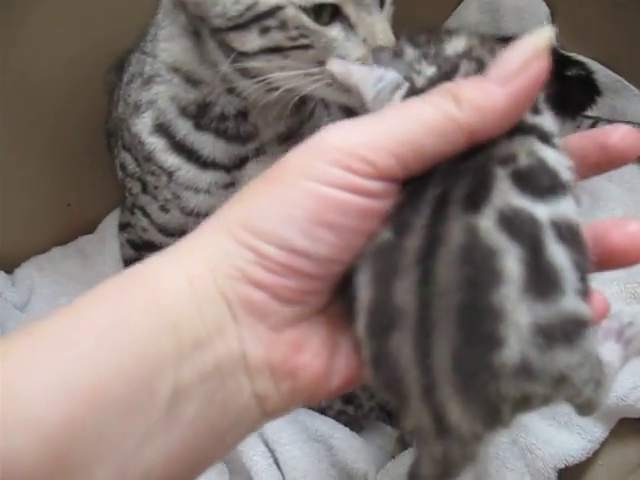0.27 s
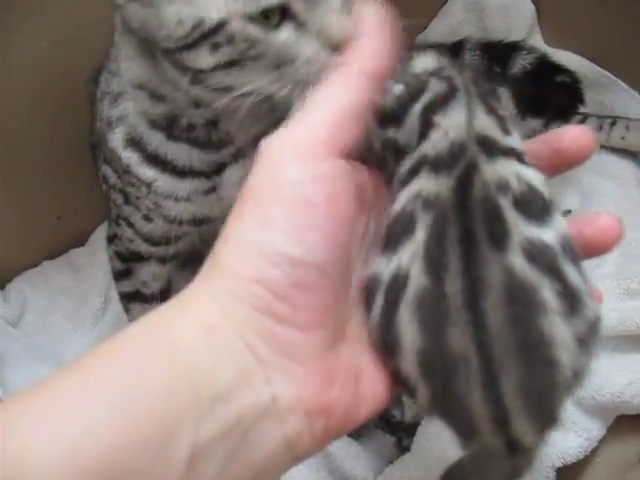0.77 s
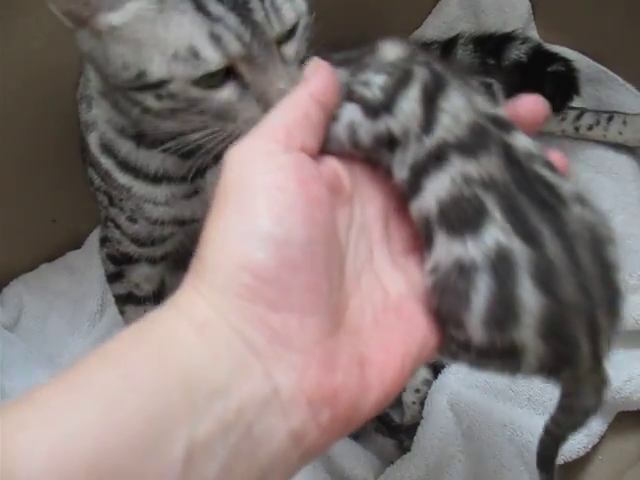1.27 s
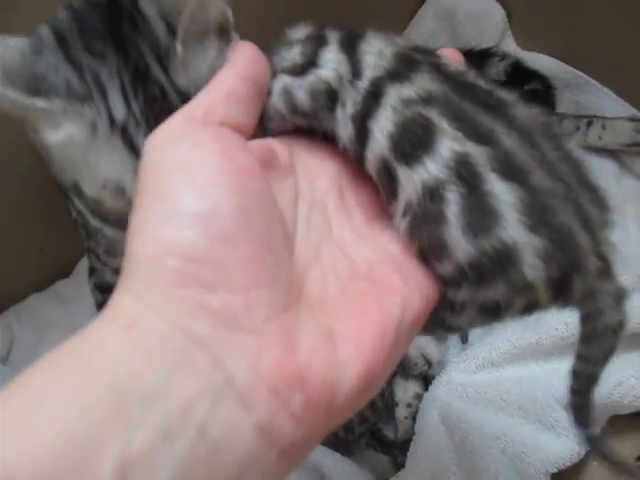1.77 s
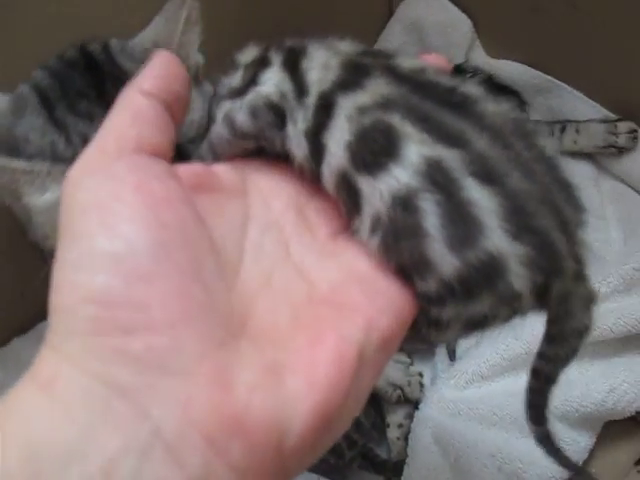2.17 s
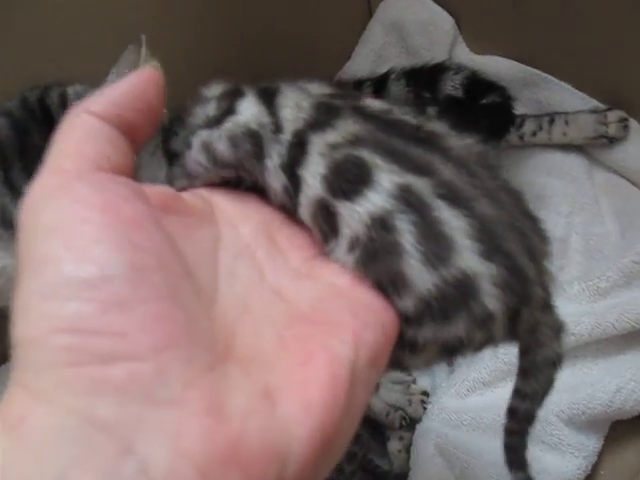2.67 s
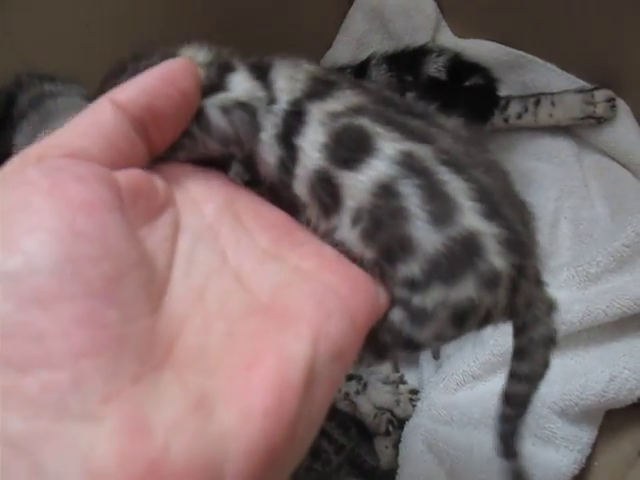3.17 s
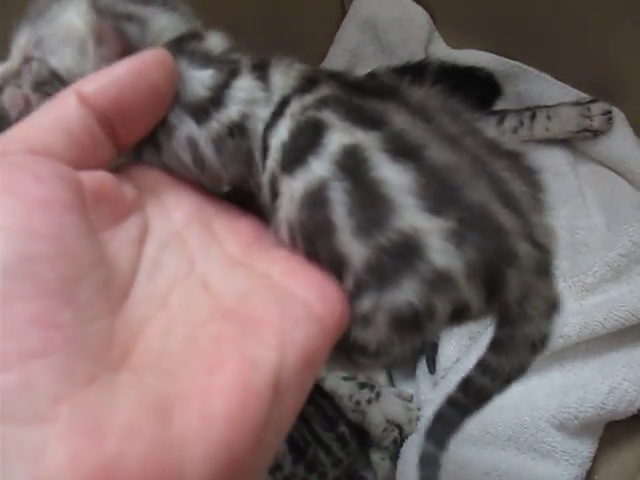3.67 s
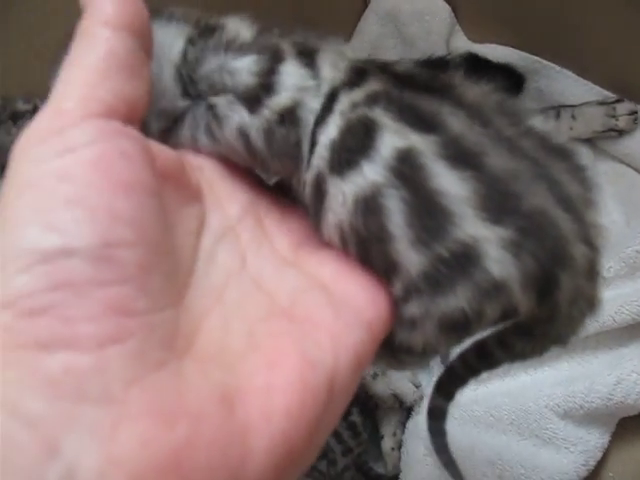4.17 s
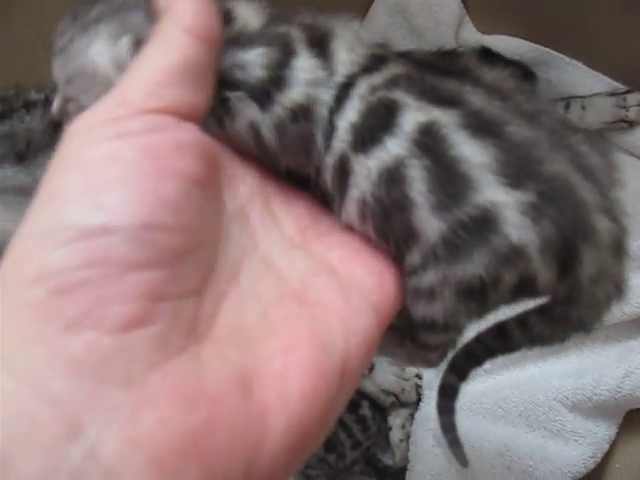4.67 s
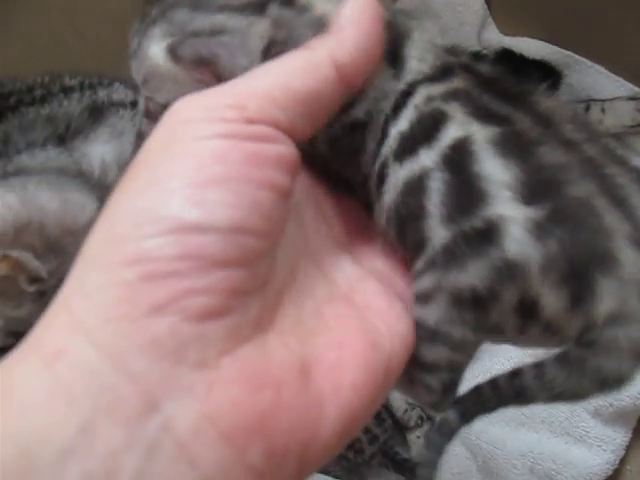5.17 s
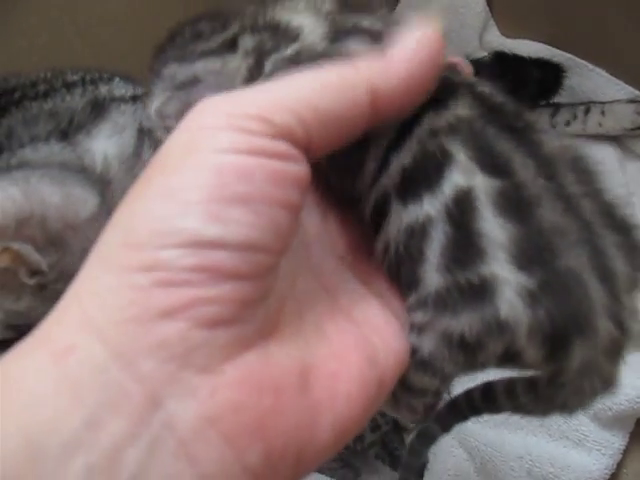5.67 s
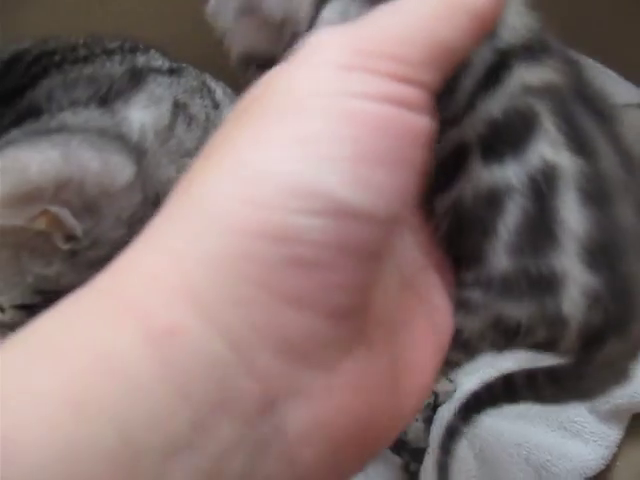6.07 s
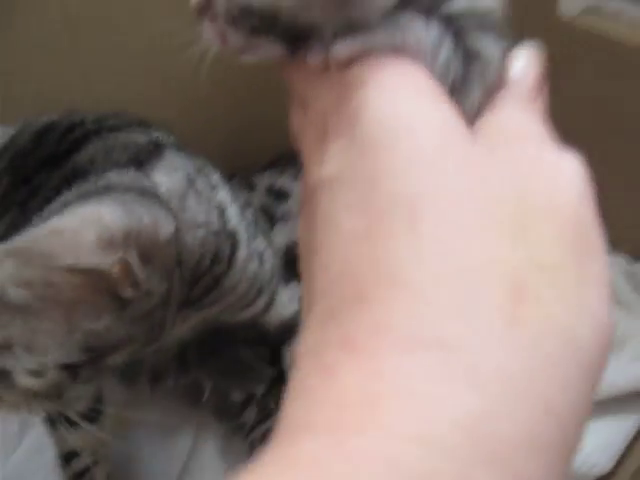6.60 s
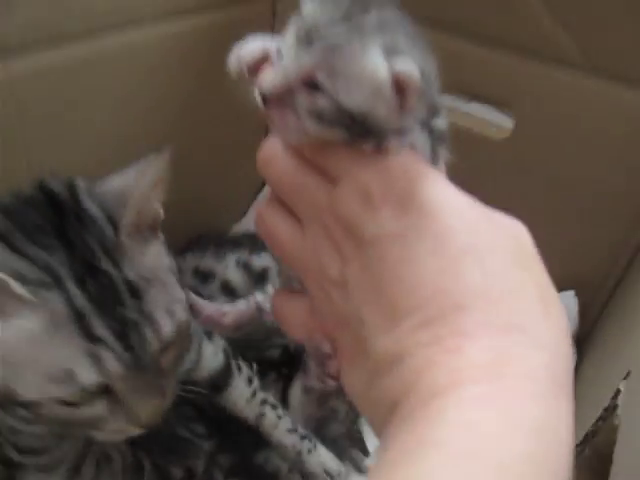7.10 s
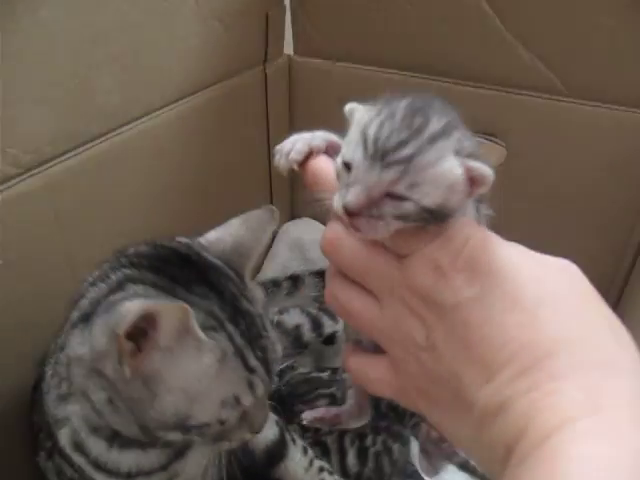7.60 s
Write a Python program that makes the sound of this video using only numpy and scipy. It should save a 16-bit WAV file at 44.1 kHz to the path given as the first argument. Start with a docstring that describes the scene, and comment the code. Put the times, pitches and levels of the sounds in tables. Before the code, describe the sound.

Close, quiet indoor sound of a mother cat's soft thudding purr with short gaps between breaths. Above it come brief, arching kitten mews with cracks in pitch: two early, then two late, the last being strongest. Small wet clicks and fabric rubbing come and go, the rubbing strongest just before seven seconds. The mono microphone has steady hiss, a thin whistle and faint rapid ticking.

```python
"""A mother cat purrs breath by breath in soft hiss, and soon her newborn kitten mews above her.
The mews, from a kitten lifted in a hand over a towel in a cardboard box, are short arches with pitch breaks.
They are built from partials, breath puffs and resonances; each purr beat is a thud that rings the box.
Fur and towel rustle as swelling noise; small mouth and claw clicks are noise bursts that ring.
A small mono camera adds hiss, a thin steady whistle and a faint tick thirty times a second."""
import sys
import numpy as np
from scipy import signal
from scipy.io import wavfile
from scipy.ndimage import uniform_filter1d

SR = 44100
rng = np.random.default_rng(int(sys.argv[2]) if len(sys.argv) > 2 else 0)


def store_pcm(level_fs):
    """Save levels as 16-bit WAV."""
    pcm = np.round(np.clip(level_fs, -1, 1) * 32767).astype(np.int16)
    wavfile.write(sys.argv[1], SR, np.atleast_2d(pcm).T)


N = 345744


def gain_of(db):
    """Turns decibels into a plain multiplier."""
    return 10 ** (np.asarray(db) / 20)


def evened(x):
    """Scales a signal to rms 1."""
    return x / np.sqrt(np.mean(x ** 2) + 1e-20)


def read(points, hz):
    """Reads between the points of a table, on a log-frequency axis."""
    point_hz, value = np.transpose(points)
    return np.interp(np.log(hz + 1), np.log(point_hz + 1), value)


def add(mix, s, sound):
    """Mixes a sound in at time s, in seconds."""
    part = mix[round(s * SR):][:len(sound)]
    part += sound[:len(part)]


def resonate(x, hz, width):
    """Shifts hz (which may glide) down to zero, smooths, and shifts back: a resonance of gain 1."""
    turn = np.exp(2j * np.pi * np.cumsum(hz * np.ones(len(x))) / SR)
    memory = np.exp(-np.pi * width / SR)
    smooth = signal.lfilter([1 - memory], [1, -memory], x / turn + 1e-18)
    return 2 * (turn * smooth).real


def wander(shape, size):
    """Random curves, smoothed twice over size samples, of rms 1."""
    once = uniform_filter1d(rng.standard_normal(shape), size)
    return evened(uniform_filter1d(once, size))


def noise(spectrum, patchy_db, flicker_db):
    """Noise of rms 1 from random short spectra, with drifting patches and a flicker shared by all bands."""
    frames, hz = N // 256 + 5, np.fft.rfftfreq(1024, 1 / SR)
    a, b, patches = rng.standard_normal((frames, 513, 3)).T
    patches = uniform_filter1d(patches, size=14, axis=0)  # along frequency
    patches = evened(uniform_filter1d(patches, size=12, axis=1))  # along time
    flicker = rng.standard_normal(frames)
    level_db = read(spectrum, hz)[:, None] + patchy_db * patches + flicker_db * flicker
    z = (a + 1j * b) * gain_of(level_db)
    return evened(signal.istft(z, nperseg=1024, noverlap=768)[1][:N])


def air():
    """Room air and microphone hiss are shaped noise, and narrow bands of noise hum as low room modes."""
    # Colour of the hiss. Each row: frequency in Hz, relative level in dB per Hz.
    air_colour = [(20, 23), (60, 10.5), (95, 14), (130, 15), (175, 13), (230, 9), (400, 10), (1100, 4.5),
                  (2000, 1.5), (5000, -1.5), (9000, -2.5), (15000, -1.5)]
    # Low room modes. Each row: frequency in Hz, width in Hz, level in dB rms.
    room_modes = [(131.4, 11.7, -74), (179.8, 21, -77)]
    modes = sum(gain_of(db) * evened(resonate(rng.standard_normal(N), hz, width))
                for hz, width, db in room_modes)
    hiss_db = -61
    return gain_of(hiss_db) * noise(air_colour, patchy_db=0.9, flicker_db=1.53) + modes


def camera():
    """Steady whistles are pure tones; each tick is a single jolt that rings two resonances."""
    # Whistles. Each row: frequency in Hz, level in dB rms.
    whistle_table = [(5880, -60), (1119, -83), (1199.5, -85), (1561.6, -87), (3045.8, -90), (5910, -88)]
    # Resonances of the tick. Each row: frequency in Hz, width in Hz, level in dB rms.
    tick_rings = [(6200, 530, -83), (3900, 150, -83.5)]
    t = np.arange(N) / SR
    jolts = (np.arange(N) % (SR // 30) == 0) * 1.  # thirty a second
    whistles = sum(np.sqrt(2) * gain_of(db) * np.sin(2 * np.pi * hz * t) for hz, db in whistle_table)
    ticks = sum(gain_of(db) * evened(resonate(resonate(jolts, hz, width), hz, width))
                for hz, width, db in tick_rings)
    return whistles + ticks


def rustle():
    """Fur and towel rub as soft grainy friction noise, under slow strokes that swell and fade."""
    # Strokes. Each row: peak time in seconds, rise in seconds, fall in seconds, peak level in dB.
    strokes = [(.01, .05, 0.2, -64), (.33, .1, .1, -64), (.62, 0.3, 0.052, -59), (0.909, .12, 0.16, -61),
               (1.78, .3, 0.18, -63), (2.18, 0.13, 0.36, -63), (3.08, 0.67, 0.23, -66),
               (3.37, 0.1, 0.13, -60.5), (3.75, 0.33, 0.64, -65.5), (4.34, .04, 0.028, -68),
               (4.83, 0.11, 0.077, -63), (5.03, 0.075, .08, -66), (5.23, 0.13, 0.12, -62.5),
               (5.66, 0.076, .03, -72), (6.3, 0.096, 0.18, -58), (6.82, 0.34, 0.72, -55.5),
               (6.99, 0.036, 0.028, -53), (7.2, .1, .2, -81), (7.68, .1, 0.11, -81.5)]
    # Colour of the rubbing. Each row: frequency in Hz, relative level in dB per Hz.
    rub_colour = [(1500, -10), (3000, -8.5), (5200, -8), (7000, -5.5), (9500, -2), (11000, 1.5),
                  (12500, -3.5), (15000, -19)]
    t = np.arange(0, N + 64, 64) / SR
    power = np.zeros(len(t))
    for s, rise, fall, db in strokes:
        distance = (t - s) / np.where(t < s, rise, fall)
        power += gain_of(db - 12 * distance ** 2) ** 2  # 12 dB down one rise or fall time away
    level = np.repeat(np.sqrt(power), 64)[:N]
    return level * noise(rub_colour, patchy_db=1.4, flicker_db=1.2)


def purr():
    """Each flap of the larynx is one soft thud that rings the box; beats vary a little in time and size."""
    # Breaths. Each row: first beat in seconds, last beat in seconds, number of beats,
    # start level in dB, end level in dB (levels before the overall gain below).
    breaths = [(.009, .091, 3, -56, -58), (.13, 0.381, 7, -44.5, -58.5), (0.478, .863, 10, -54, -49.5),
               (.949, 1.098, 5, -56, -50.5), (1.209, 1.68, 12, -48.5, -51.5),
               (1.775, 2.198, 12, -52.5, -52.5), (2.291, 2.918, 17, -50, -49.5),
               (3.07, 3.402, 10, -52, -60), (3.518, 3.758, 7, -47.5, -47), (3.803, 4.073, 8, -50, -49.5),
               (4.161, 4.436, 8, -52, -55), (4.505, 4.585, 3, -54, -50), (4.667, 5.032, 10, -50.5, -48),
               (5.071, 5.351, 8, -52, -47), (5.438, 5.512, 3, -53, -50), (5.624, 5.935, 9, -55, -51),
               (6.033, 6.373, 9, -50, -50.5), (6.493, 6.709, 7, -55, -53), (7.241, 7.68, 11, -46.5, -49.5),
               (7.752, 7.832, 3, -52, -57)]
    # The box and throat ring on. Each row: frequency in Hz, width in Hz, level in dB relative to the thud.
    chest_rings = [(168.2, 8.7, -3.5), (130.6, 10.6, -15), (422, 140, 3.5)]
    lag, swell_db = 0.019, 1.95  # beats inside a breath come late (scales the lag); its middle is louder
    thud_s = .006  # the thud peaks this long after its start
    knocks = np.zeros(N)
    for first, last, beats, start_db, end_db in breaths:
        u = np.linspace(0, 1, round(beats))  # progress through the breath
        late, size = rng.standard_normal((round(beats), 2)).T
        at = first + (last - first) * (u + lag * u * (1 - u)) - thud_s + 0.00056 * late
        db = start_db + (end_db - start_db) * u + swell_db * np.sin(np.pi * u) + 1.3 * size
        knocks[np.clip(at * SR, 0, N - 1).astype(int)] = gain_of(db)
    t = np.arange(6000) / SR
    thud = np.exp(-((t - thud_s) / 0.0034) ** 2) * np.cos(2 * np.pi * 185 * (t - .0066))
    ring = sum(gain_of(db) * np.exp(-np.pi * width * t) * np.cos(2 * np.pi * hz * (t - thud_s))
               for hz, width, db in chest_rings)
    soft_start = 1 - np.exp(-t / 0.0048)
    return 0.44 * signal.oaconvolve(knocks, thud + ring * soft_start)[:N]


def clicks():
    """Mouth and claw clicks: a snap and a short burst of noise ring one resonance and the treble."""
    # Each row: start in seconds, peak level of the ring in dB, ring frequency in Hz,
    # treble in dB relative to the ring, time for the burst to fall 60 dB in seconds.
    click_table = [(.726, -42.5, 2500, -20, .01), (.761, -44, 2480, -20, 0.011),
                   (1.285, -37, 3380, -15, .013), (1.304, -37.5, 3280, -17, 0.065),
                   (1.685, -47, 2980, -1, 0.011), (1.798, -52.5, 1500, -20, .01),
                   (2.859, -40.5, 2160, -16, .02), (2.899, -58, 6000, 12, .01),
                   (3.3, -48.5, 1590, -20, .01), (3.363, -39.5, 3600, -2, 0.032),
                   (3.654, -40, 2680, -22, 0.014), (3.702, -48, 2600, -15, .011),
                   (3.785, -46.5, 647, -30, 0.039), (4.067, -50, 2800, -10, .01),
                   (5.722, -41, 1960, -30, 0.032), (5.799, -43, 2470, -10, 0.018),
                   (6.101, -47, 3000, -12, 0.014), (6.12, -41, 2170, -25, .011),
                   (6.178, -36, 2880, -17, 0.0096), (6.337, -36, 2670, -20, 0.019),
                   (6.8, -41, 1230, -25, 0.019), (6.866, -50, 1200, -17, .017),
                   (7.03, -42.5, 4000, -6, .01), (7.074, -48, 2500, -15, .014),
                   (7.092, -53, 5400, -13, 0.0033), (7.21, -49, 1192, -20, .012),
                   (7.277, -35.5, 2400, -30, 0.027), (7.288, -37, 2450, -30, 0.032),
                   (7.343, -39, 6000, 3.5, .009), (7.533, -39.5, 726, -30, 0.0073),
                   (7.628, -47, 1500, -20, .009), (7.713, -37.5, 1910, -35, .011),
                   (7.762, -48.5, 670, -16, 0.026), (7.781, -42, 1780, -25, 0.0099)]
    broad_hz, knee_hz = 4000, 1740  # low clicks ring narrow, those above the knee are broad
    out, t = np.zeros(N), np.arange(1200) / SR
    for s, db, hz, treble_db, t60 in click_table:
        width = broad_hz * hz ** 2 / (hz ** 2 + knee_hz ** 2)
        snap = 6.6 * (t == 0)
        burst = (rng.standard_normal(len(t)) + snap) * gain_of(-60 * t / max(t60, .002))
        body = resonate(resonate(burst, hz, width), hz, width)
        treble = resonate(resonate(burst, 8800, 4000), 8800, 4000)
        sound = body / abs(body).max() + gain_of(treble_db) * treble / abs(treble).max()
        add(out, s, gain_of(db) * sound)
    return out


def creak():
    """A hoarse creak is uneven voice pulses and a little noise, in a wide gliding resonance."""
    # Two joined pieces. Each row: time in seconds, level in dB, resonance in Hz.
    s, db, hz = np.transpose(np.concatenate([
        [(1.2, -95, 2750), (1.216, -57.5, 2740), (1.226, -61, 2740), (1.24, -75, 2730)],
        [(1.24, -79, 3140), (1.248, -52, 3140), (1.3, -67, 3120)],
    ]))
    t = np.arange(s[0], s[-1], 1 / SR)
    uneven = evened(uniform_filter1d(rng.standard_normal(len(t)), size=80))
    turns = np.cumsum(560 * (1 + 0.11 * uneven)) / SR  # about 560 pulses a second
    pulses = np.diff(np.floor(turns), prepend=0) + 0.036 * rng.standard_normal(len(t))
    mouth = resonate(pulses, np.interp(t, s, hz), 2000)
    return s[0], gain_of(np.interp(t, s, db)) * evened(resonate(mouth, 1600, 2600))


def mew(rows):
    """Four low partials pass straight; mouth, third and top resonances lift the rest and breath puffs."""
    # Widths of the mouth, third and top resonances in Hz.
    widths_hz = (900, 800, 2800)
    s, *columns = np.transpose(rows)
    t = np.arange(s[0], s[-1], 1 / SR)
    curves = (uniform_filter1d(np.interp(t, s, c), size=150) for c in columns)
    (hz, first_db, second_db, mouth_hz, mouth_db, third_db, top_db,
     fall_db, third_hz, top_hz, hoarse) = curves
    # every call starts hoarse, clears within some 25 ms, and tires towards its end
    tired = np.minimum(hoarse * np.linspace(.8, 1.8, len(t)), .62)
    hoarse = np.maximum(tired, .4 * np.exp((s[0] - t) / .025))
    k = np.arange(1, 26)[:, None]  # partial numbers
    turns = np.cumsum(hz * (1 + (.001 + .004 * hoarse) * wander(len(t), size=60))) / SR
    # uneven folds: each high partial fades in and out on its own, and a hoarse voice flutters
    fading_db = -(2 + 6 * hoarse + k * hz / 2600) * abs(wander((len(k), len(t)), size=800))
    flutter = hoarse * wander(len(t), size=200)
    partials = np.sqrt(2) * np.cos(2 * np.pi * k * turns + 0.312 * k ** 2) * (k * hz < 15000)

    thinning_db = 3 * np.maximum(k * hz - 11300, 0) / 1e3  # 3 dB per kHz above 11.3 kHz
    high = (gain_of(fading_db - thinning_db) * partials)[4:].sum(axis=0)
    middle = (gain_of(hoarse * fading_db) * partials)[2:4].sum(axis=0)
    # breath noise is strongest at the start of each turn of the folds
    puffs = 7 * hoarse * (.4 + np.exp(-(turns % 1) / .3)) * rng.standard_normal(len(t))
    # flutter and puffs are strongest in the top resonance
    mouth_drive = gain_of(1.5 * flutter) * (high + middle + .3 * puffs)
    third_drive = gain_of(2 * flutter) * (high + .55 * puffs)
    top_drive = gain_of(5 * flutter) * (high + .9 * puffs)
    tract = zip((mouth_drive, third_drive, top_drive), (mouth_hz, third_hz, top_hz),
                widths_hz, (mouth_db, third_db, top_db))
    upper = sum((-1) ** n * gain_of(db) * resonate(resonate(drive, f, width), f, width)
                for n, (drive, f, width, db) in enumerate(tract))  # signs alternate

    third_fourth_db = first_db - fall_db * np.log2(k[2:4]) + hoarse * fading_db[2:4]
    low_db = np.array([first_db, second_db, *third_fourth_db])
    voice = upper + (gain_of(low_db) * partials[:4]).sum(axis=0)
    ends = np.clip(np.minimum(t - s[0], s[-1] - t) / 0.00049, 0, 1)  # avoids clicks at the ends
    return s[0], voice * ends


def kitten():
    """The kitten's voice: stretches that touch form one unbroken call, and a creak joins the mews."""
    # One table for each stretch of voice between pitch breaks. Each row: time in seconds, pitch in Hz,
    # first partial in dB, second partial in dB, mouth resonance in Hz, its level setting in dB,
    # third resonance level setting in dB, top resonance level setting in dB.
    mew_tables = [
        [(0.345, 521, -70, -57, 3600, -73, -69, -69), (0.355, 553.4, -51.5, -52, 3600, -54, -68, -67),
         (0.369, 586, -50.5, -47.5, 3730, -47, -55, -50.5), (0.383, 613, -53, -45, 3750, -40, -48, -42),
         (0.405, 668, -47.5, -48.5, 3800, -32.5, -36, -48), (0.415, 669.5, -49.5, -60, 3730, -30, -35, -51),
         (0.443, 735, -46.5, -67, 3900, -44, -41, -53), (0.451, 740, -50, -44.5, 3880, -40, -33, -55),
         (0.467, 802, -53, -45.5, 3860, -35, -34, -54), (0.484, 821.4, -53, -48, 3790, -39, -34.5, -58)],
        [(0.484, 833.5, -52, -44, 2570, -34, -37, -59), (0.496, 920, -46.5, -47, 2560, -46, -47, -61),
         (0.512, 962, -45.5, -48, 2570, -51, -42, -60), (0.53, 966, -46, -65, 2810, -51, -49, -56),
         (0.552, 951, -48, -79, 2920, -51, -52, -55), (0.562, 934, -47, -51, 2875, -55, -59, -60),
         (0.588, 845, -58, -49.5, 2710, -60, -59, -72), (0.6, 824, -77, -57, 2630, -51, -68, -77)],
        [(1.295, 698, -49, -78, 3480, -72, -78, -84), (1.303, 733.3, -67, -65, 3480, -52, -50, -62),
         (1.323, 884.6, -61, -58, 3900, -61, -59, -69), (1.343, 970, -52, -50.5, 3850, -47.5, -44.5, -55),
         (1.371, 1002, -47, -55, 4000, -56, -42.5, -59), (1.407, 972, -51, -46, 4220, -43, -46, -53.5),
         (1.485, 882, -57.5, -56, 3850, -59, -57, -57), (1.509, 840, -62, -63, 3380, -53, -60, -62),
         (1.539, 714, -57, -71, 3420, -88, -75, -72), (1.559, 640, -64, -61, 3370, -67, -78, -75),
         (1.57, 636, -81, -72, 3600, -74, -78, -72)],
        [(5.72, 531, -58.5, -51, 2260, -65, -78, -84), (5.736, 730, -49, -62, 2270, -52, -78, -84),
         (5.748, 784, -53, -58, 2380, -55.5, -78, -84), (5.772, 826, -52, -52.5, 2600, -59, -78, -80),
         (5.8, 806, -72, -62, 2430, -68, -78, -82)],
        [(5.802, 946, -53, -50, 2940, -60, -71, -55), (5.812, 969.7, -47, -61, 2930, -45.5, -56, -64),
         (5.838, 1037, -48, -60, 3000, -62, -50, -56), (5.866, 1048, -43, -51.5, 3170, -61, -58, -61),
         (5.906, 1062, -43, -52, 3160, -75, -73, -57), (5.918, 1050, -47, -59, 3170, -72, -72, -68)],
        [(5.918, 1140, -47, -49, 3090, -67, -75, -59), (5.932, 1164, -45, -54.5, 3140, -72, -73, -66),
         (5.972, 1155, -42, -58, 3160, -79, -73, -71), (5.99, 1127, -41, -64, 3180, -70, -75, -61),
         (6.012, 1035, -40.5, -64, 3100, -68, -77, -66), (6.032, 957, -44, -60, 2910, -70, -71, -68),
         (6.05, 828, -57, -53, 2790, -64, -75, -76), (6.06, 750, -85, -66, 2820, -68, -75, -76)],
        [(6.115, 539, -51, -65, 2660, -67, -78, -82), (6.119, 554, -56, -52.5, 2630, -69, -78, -80),
         (6.151, 613, -56.5, -58, 2720, -63, -78, -80), (6.177, 508, -52.5, -51, 2630, -55, -78, -82),
         (6.191, 507.7, -57, -65, 2630, -67, -76, -82), (6.2, 493.1, -69, -71, 2630, -69, -74, -80)],
        [(7.285, 492, -53.5, -48, 2780, -56, -53, -78), (7.297, 565, -54, -45.5, 2900, -42.5, -64, -80),
         (7.309, 580.1, -53, -46, 2810, -62, -67, -82), (7.315, 594, -57, -52, 2810, -62, -68, -78)],
        [(7.315, 644, -53, -54, 2730, -69, -70, -74), (7.329, 686, -53, -50, 2740, -58, -70, -70),
         (7.343, 690, -53, -54, 2750, -56, -70, -72)],
        [(7.345, 850, -61, -43, 2800, -42, -54, -63), (7.373, 888, -57, -45.5, 2880, -40, -46, -57.5),
         (7.411, 948, -43.5, -42.5, 3000, -42, -61, -47.5), (7.445, 998, -40.5, -39, 2860, -67, -40.5, -49),
         (7.455, 983, -42, -37, 2890, -64, -52, -49.5), (7.481, 955, -40.5, -36, 2890, -62, -56, -44),
         (7.493, 970, -42, -41, 2880, -77, -78, -51), (7.513, 1001, -40.5, -60, 2910, -92, -68, -50),
         (7.559, 962, -41, -51.5, 2840, -79, -76, -53.5), (7.619, 863, -54.5, -53, 2670, -71, -72, -62),
         (7.634, 962.6, -44.5, -51, 2640, -83, -78, -57)],
    ]
    # One row a stretch: fall of the third and fourth partials in dB an octave,
    # third resonance in Hz, top resonance in Hz.
    voice_table = [(1.5, 5460, 9150), (28, 5380, 9500), (3, 5930, 8700), (22, 5800, 6100), (11, 5800, 9900),
                   (25, 6000, 8300), (1, 5000, 8500), (-1.5, 5000, 10000), (6, 3500, 7300),
                   (15, 5840, 9600)]
    # Basic hoarseness of each stretch, from 0 to 1.
    hoarse_table = (.42, .6, .15, .05, .05, .05, .12, .05, .06, .07)
    stretches = [[(*row, *voice, hoarse) for row in rows]
                 for rows, voice, hoarse in zip(mew_tables, voice_table, hoarse_table)]
    out, calls = np.zeros(N), stretches[:1]
    for rows in stretches[1:]:
        gap_s = rows[0][0] - calls[-1][-1][0]
        if gap_s < 1e-3:
            calls[-1] = calls[-1] + rows
        else:
            calls.append(list(rows))
    for rows in calls:
        add(out, *mew(rows))
    add(out, *creak())
    return out


def box(x):
    """Box echo: sparse taps of random sign, one in every 20 samples, each band dying at its own speed."""
    # Each row: frequency in Hz, time to fall 60 dB in seconds.
    box_decay = [(300, .2), (1000, .2), (3000, .14), (9000, .08)]
    taps = np.zeros(SR // 2)
    at = np.arange(100, SR // 2 - 20, 20)
    taps[at + rng.integers(0, 20, len(at))] = rng.choice([-1., 1.], len(at))
    hz, t, z = signal.stft(taps, SR, nperseg=256)
    fade = gain_of(-60 * t / read(box_decay, hz)[:, None])
    tail = signal.istft(z * fade, SR, nperseg=256)[1]
    return signal.oaconvolve(x, tail / np.linalg.norm(tail))[:N]


def scene():
    """Kitten and clicks echo in the box, the rest joins dry, and one microphone feeds both channels."""
    near = kitten() + clicks()
    near = near + gain_of(-17) * box(near)
    mono = near + purr() + rustle() + camera() + air()
    return np.array([mono, mono])


def record(dry):
    """The converter colours the treble, then a steep filter removes what lies above its band."""
    # A roll-off into a deep notch and a dim shelf above it. Each row: frequency in Hz, level in dB.
    converter = [(9800, 0), (10600, -5), (11200, -12), (11600, -22), (11760, -42), (11920, -24),
                 (12300, -15), (13000, -10), (15700, -11)]
    edge_hz = 15770
    hz = np.linspace(0, SR / 2, 2049)
    colour = signal.firwin2(1023, hz, gain_of(read(converter, hz)), fs=SR)
    edge = signal.firwin(2047, edge_hz, window=("kaiser", 9), fs=SR)
    return signal.oaconvolve(dry, np.convolve(colour, edge)[None], "same")


dry = scene()
out = record(dry)
store_pcm(out)
```